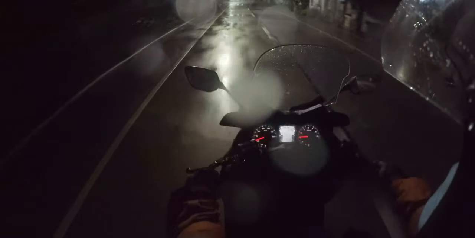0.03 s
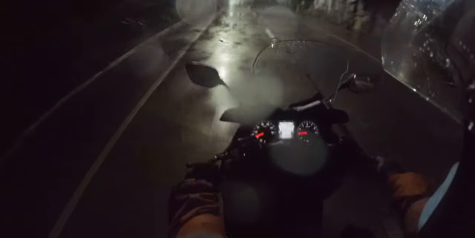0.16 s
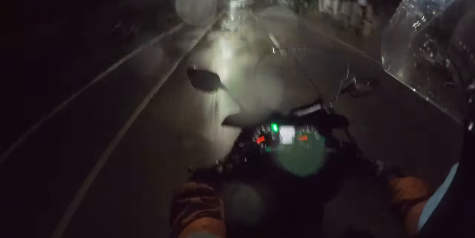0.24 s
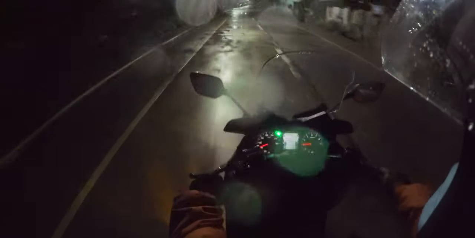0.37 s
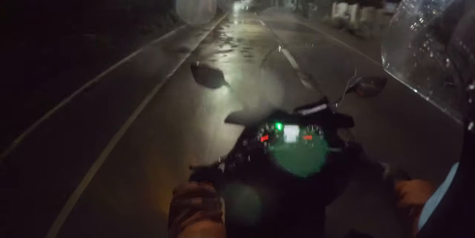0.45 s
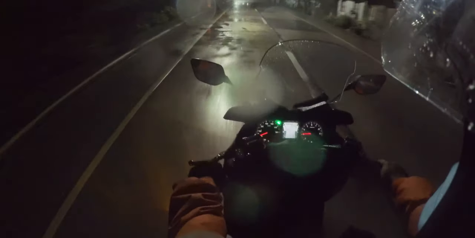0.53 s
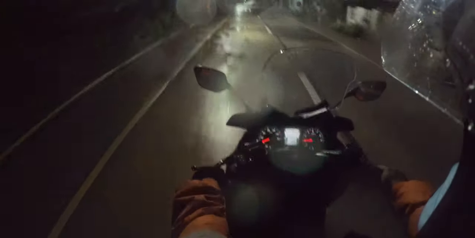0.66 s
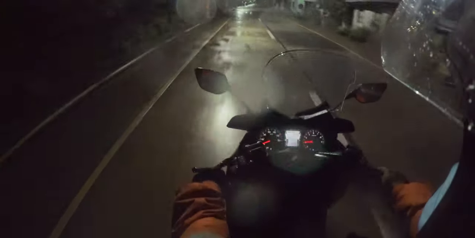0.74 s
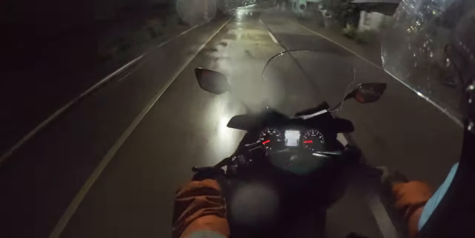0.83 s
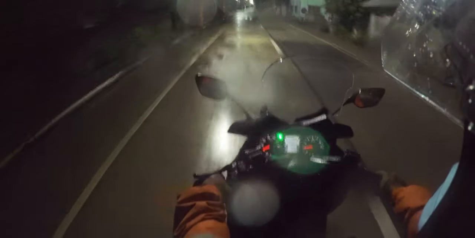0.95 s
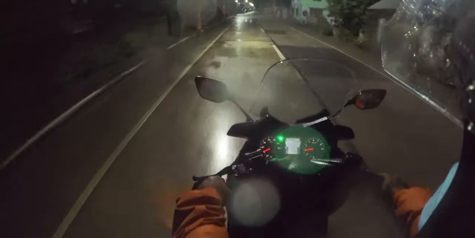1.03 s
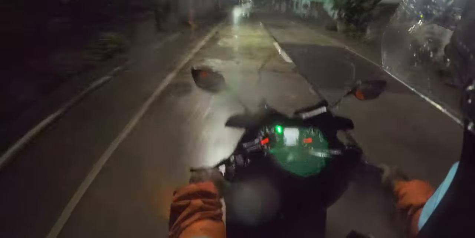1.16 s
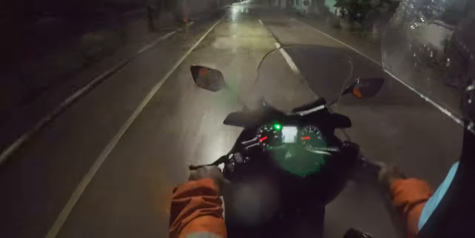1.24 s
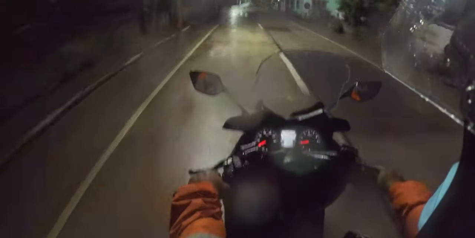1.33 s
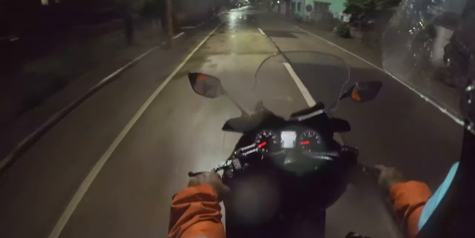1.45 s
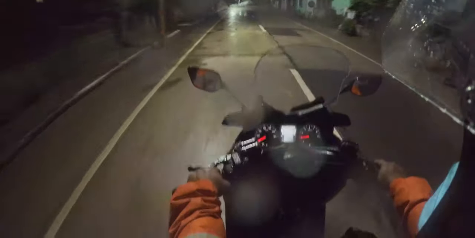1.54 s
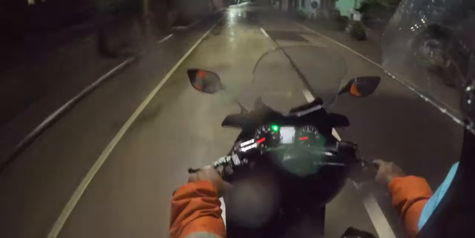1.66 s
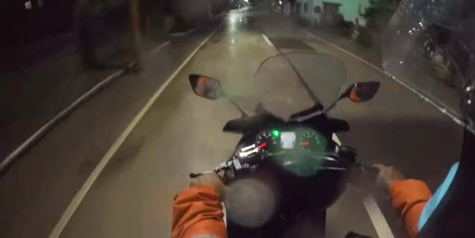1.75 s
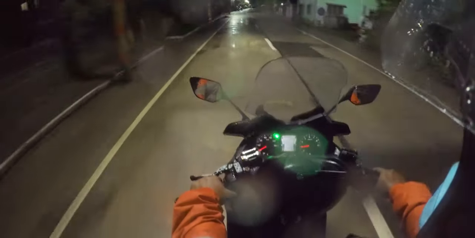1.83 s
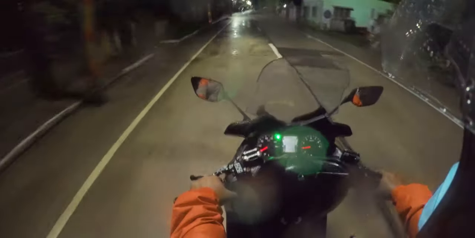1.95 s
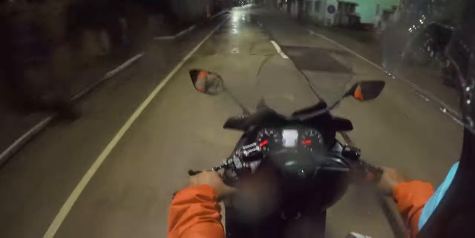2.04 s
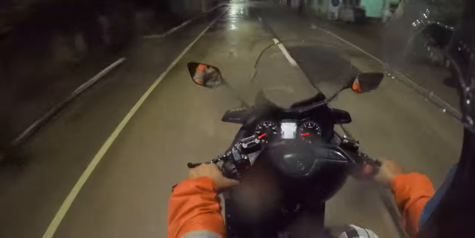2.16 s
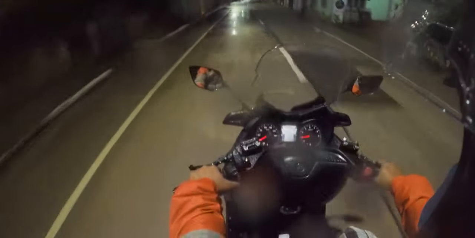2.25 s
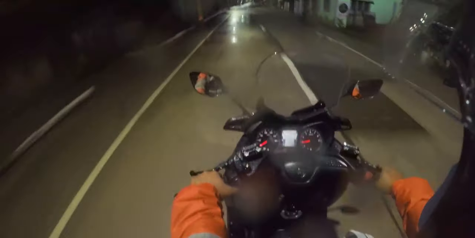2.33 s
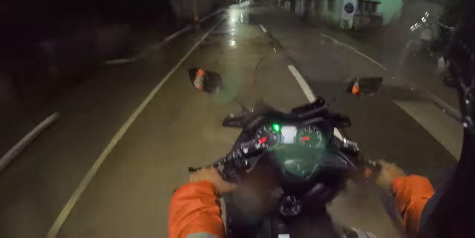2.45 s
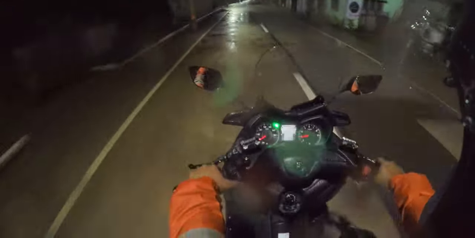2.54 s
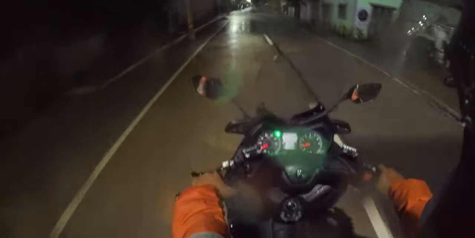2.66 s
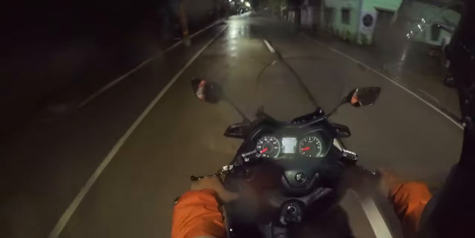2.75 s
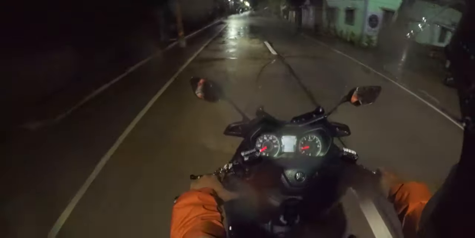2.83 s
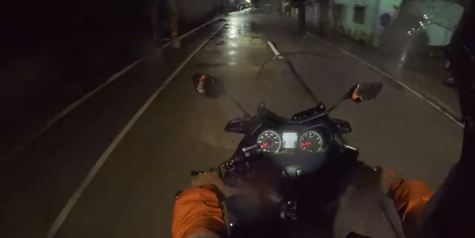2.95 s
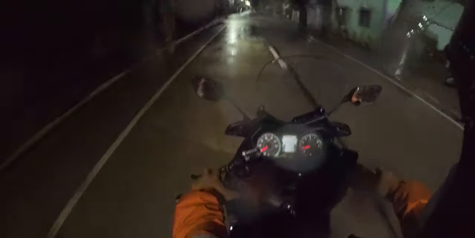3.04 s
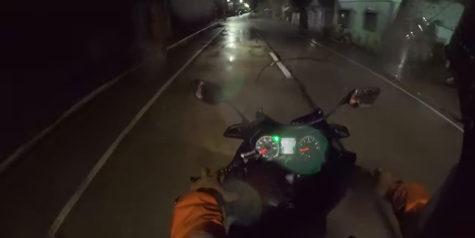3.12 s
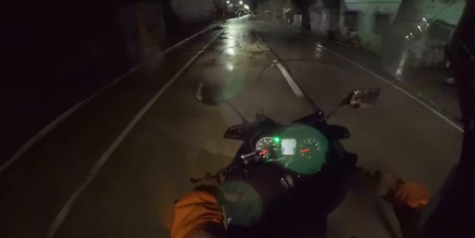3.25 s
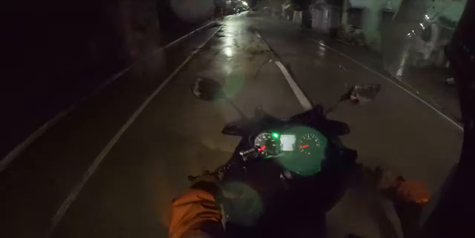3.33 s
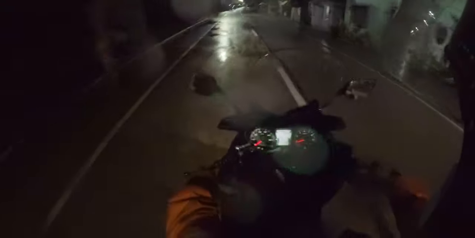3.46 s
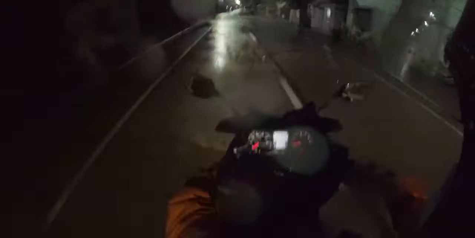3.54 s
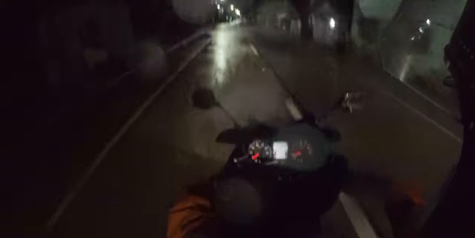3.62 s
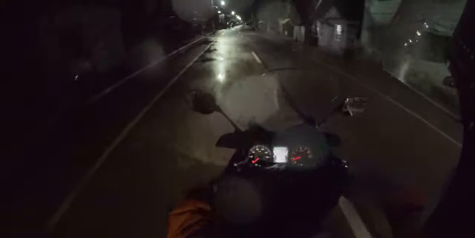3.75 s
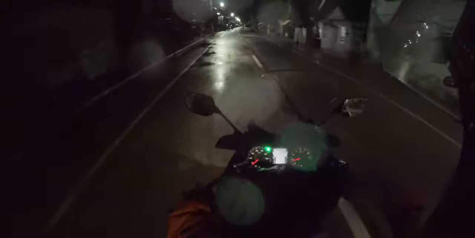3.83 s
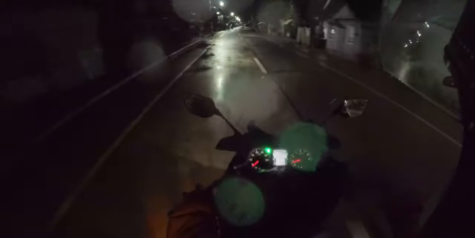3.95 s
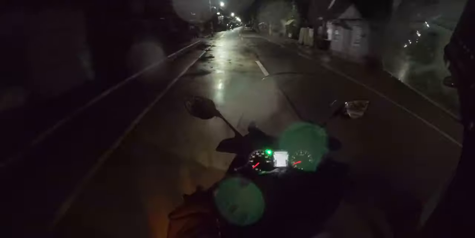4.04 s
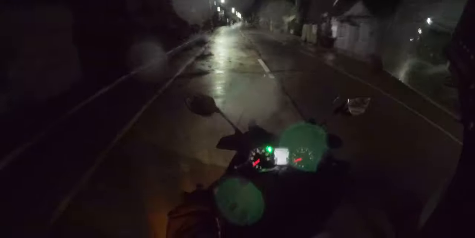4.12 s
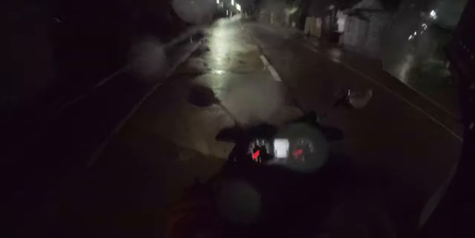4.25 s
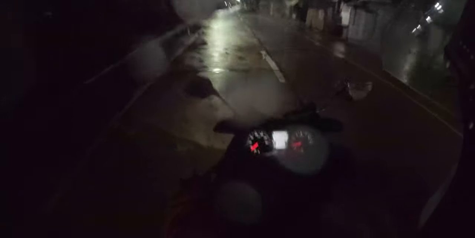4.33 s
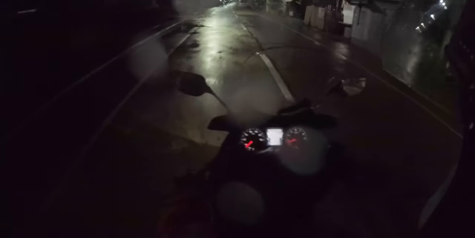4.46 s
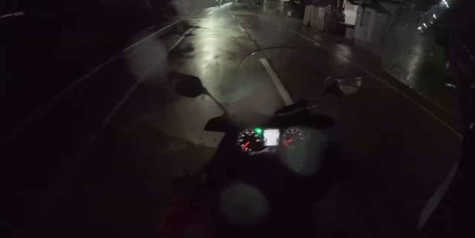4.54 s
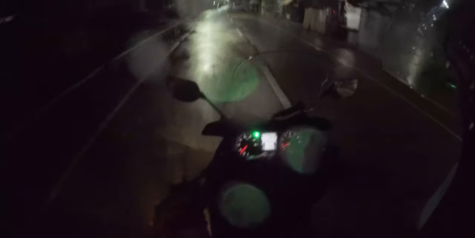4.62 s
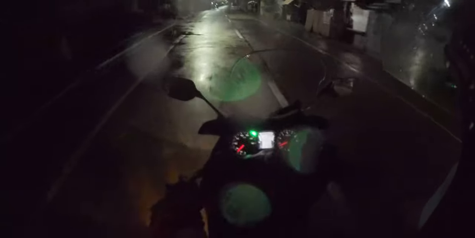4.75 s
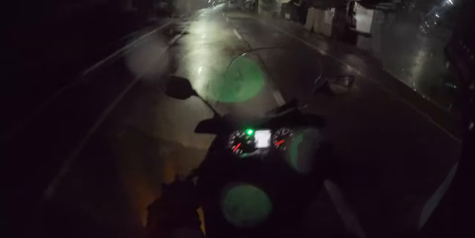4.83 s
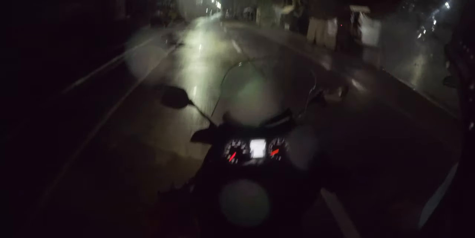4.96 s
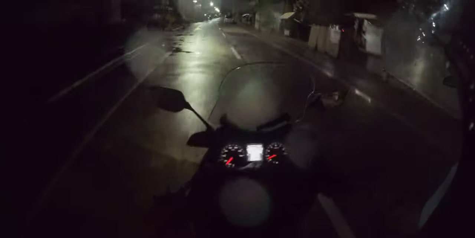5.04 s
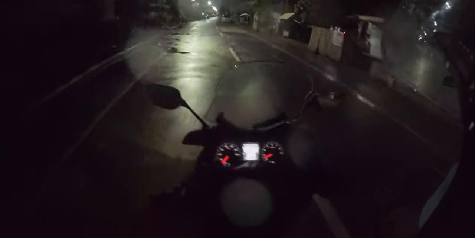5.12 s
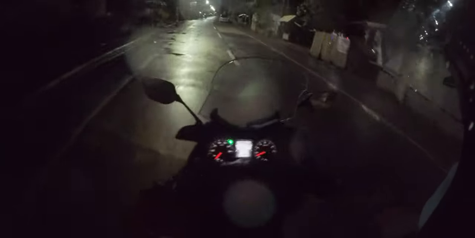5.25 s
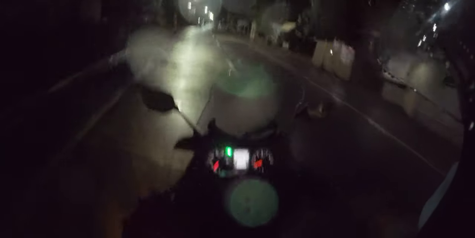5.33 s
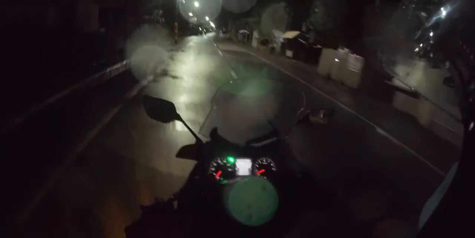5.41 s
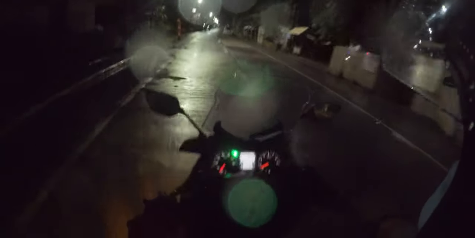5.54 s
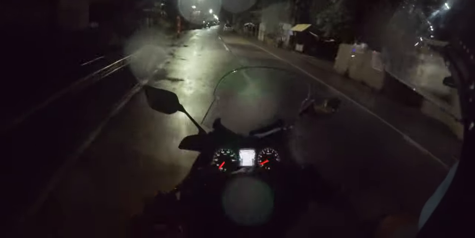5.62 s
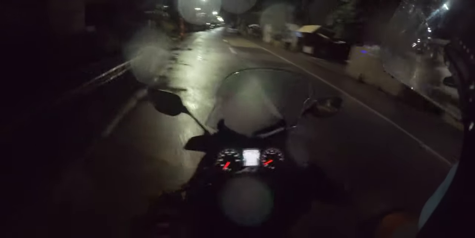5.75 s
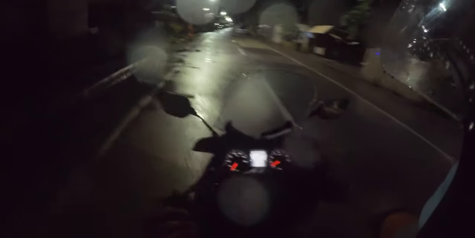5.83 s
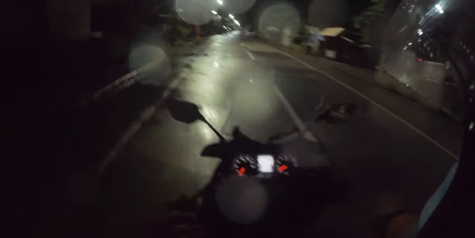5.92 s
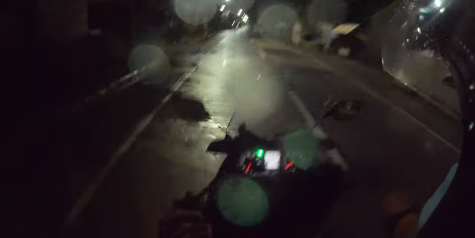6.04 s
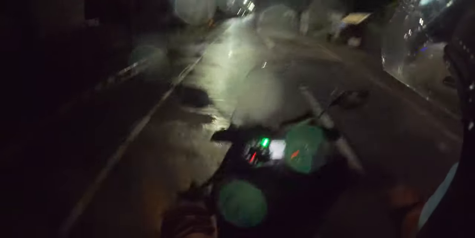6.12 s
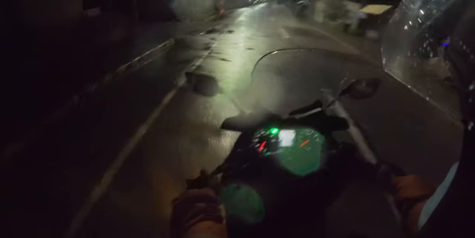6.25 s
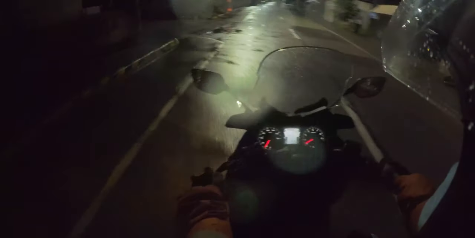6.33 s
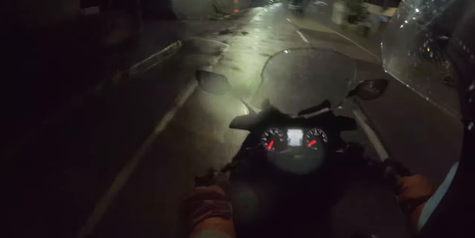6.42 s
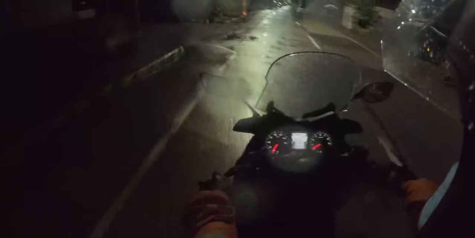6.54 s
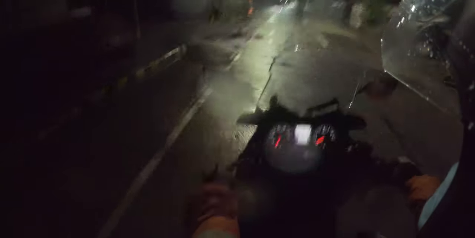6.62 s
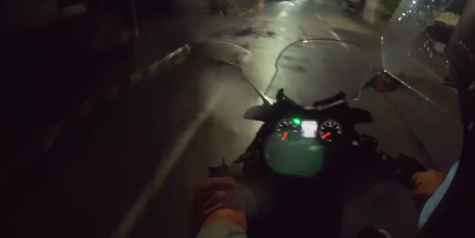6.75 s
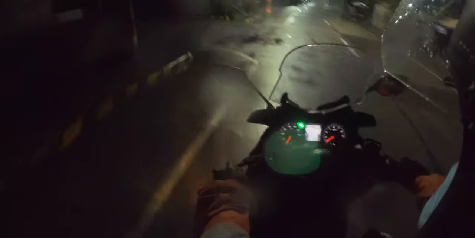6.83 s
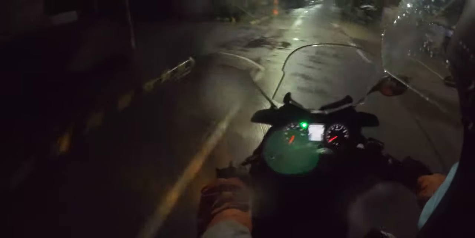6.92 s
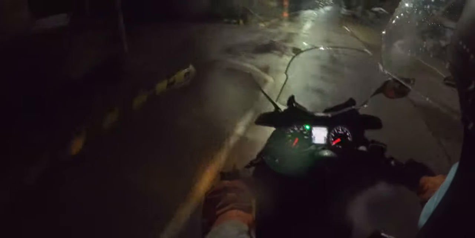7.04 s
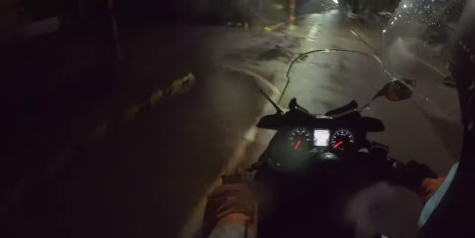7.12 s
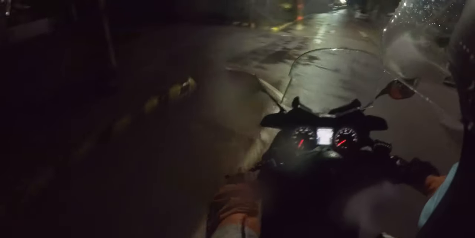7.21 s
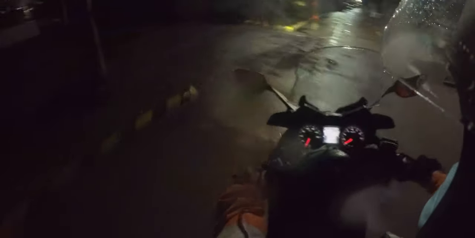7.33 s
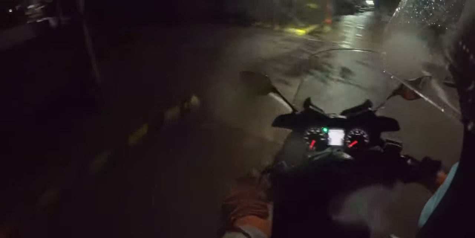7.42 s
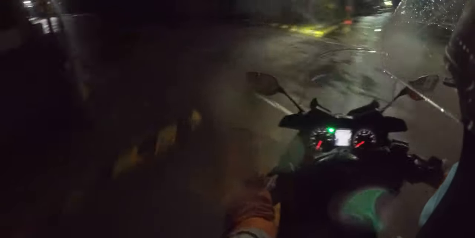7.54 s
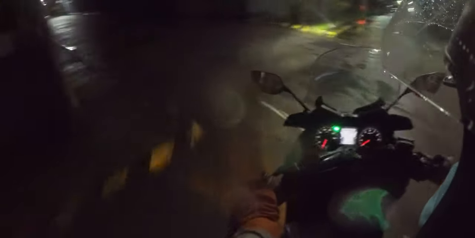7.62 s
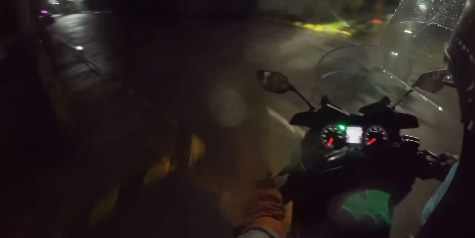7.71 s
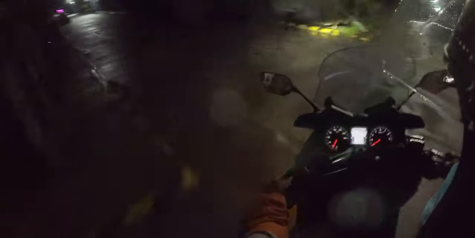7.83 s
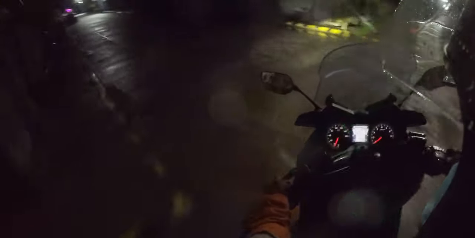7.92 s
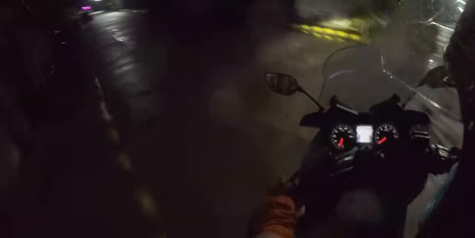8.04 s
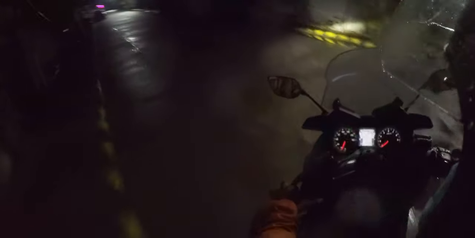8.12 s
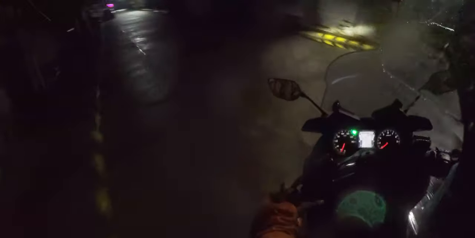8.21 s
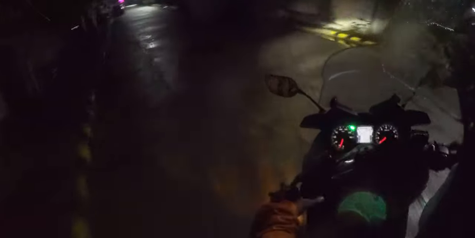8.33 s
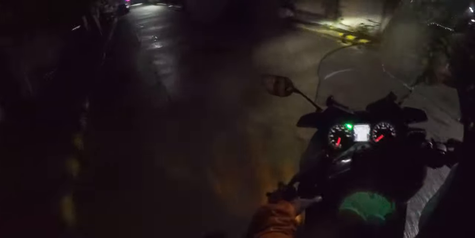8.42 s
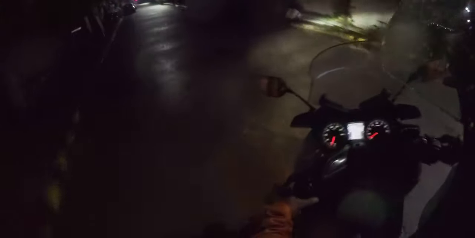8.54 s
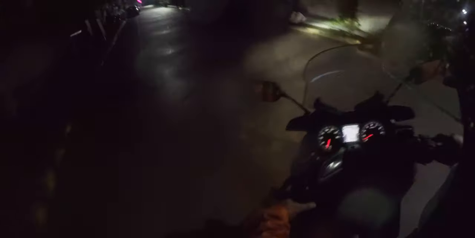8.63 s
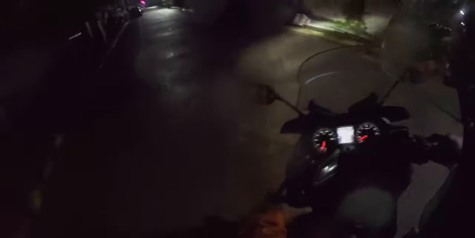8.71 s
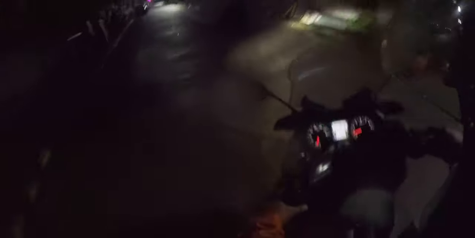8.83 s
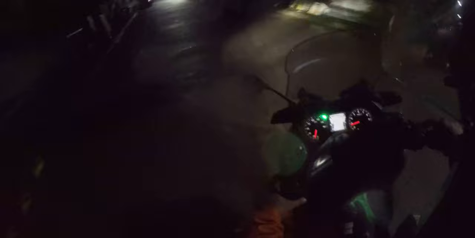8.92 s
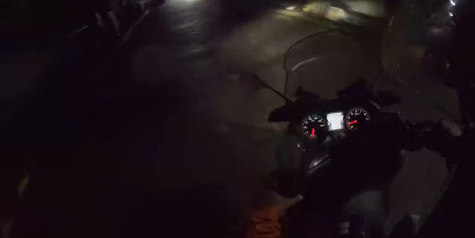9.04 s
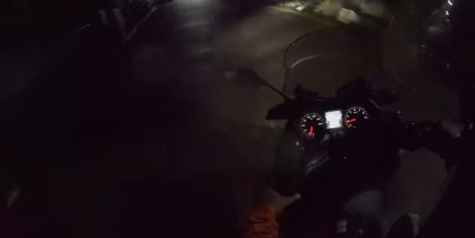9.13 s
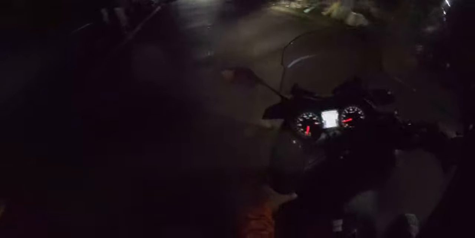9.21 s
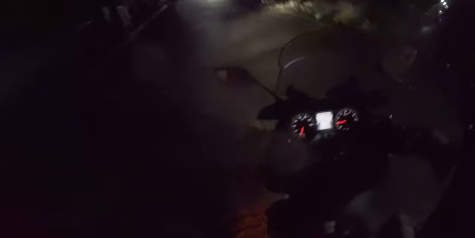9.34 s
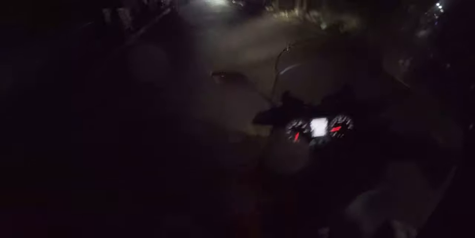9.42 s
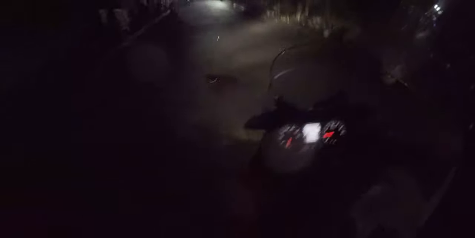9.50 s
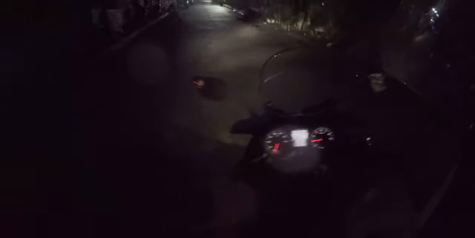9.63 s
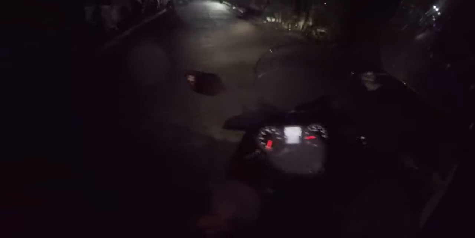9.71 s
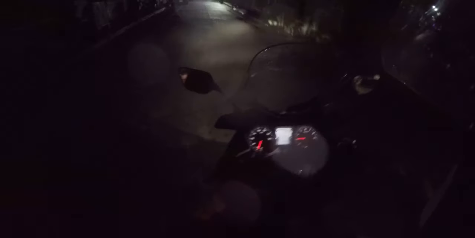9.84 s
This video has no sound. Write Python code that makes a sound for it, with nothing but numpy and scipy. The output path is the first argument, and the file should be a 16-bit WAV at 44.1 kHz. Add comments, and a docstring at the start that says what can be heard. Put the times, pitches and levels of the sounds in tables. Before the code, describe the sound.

A rider's helmet microphone, inside a plastic case, travels along a wet street at night. From 0 to 3.5 seconds, strong low wind flutters and thuds in irregular swells over a dull roar, with patchy wet tyre and rain hiss. Rain gear rustles in dense dry ticks, rapid flaps and short sleeve strokes, especially until 2.8. The bodywork hums low. Drops ring briefly at about 1.0, 1.8 and 2.1; hard cracks strike at 2.4 and most strongly at 3.3. Broad cloth strokes follow around 3.6 to 4.2. From 4.5 the wind, hiss and rustle shrink as the scooter slows. Distinct hollow drops tap at 5.2, 5.8, 6.1, 7.3 and 7.8. Around 8.5 it is nearly stopped and quiet, with barely audible insects. A thin belt whine flickers, peaking near 9.2, while a low pulsing engine gently builds and wind and hiss lift slightly to 9.9.

```python
"""A wet street at night, heard from a cased camera on the helmet of a scooter rider who slows down.
Wind is an uneven slow swing over a lumpy roar of noise; tyres and rain hiss as noise in drifting patches.
The rain gear rustles as many tiny noise slips, the bodywork hums and booms, and insects chirr faintly.
Drops tick and ring on the plastic case as dying sines, and hard ones crack with a burst of noise.
A belt drive whines as narrow noise, and near the end the engine picks up as a stack of harmonics."""
import sys
import numpy as np
from scipy import signal
from scipy.fft import rfft, irfft, next_fast_len
from scipy.io import wavfile
from scipy.ndimage import uniform_filter1d

SR = 44100
rng = np.random.default_rng(int(sys.argv[2]) if len(sys.argv) > 2 else 0)


def persist_wave(psi):
    """Save psi, clipped to +-1, as 16-bit WAV."""
    counts = np.round(np.clip(psi, -1, 1) * 32767).astype(np.int16)
    wavfile.write(sys.argv[1], SR, np.atleast_2d(counts).T)


def magnitude_from_level(level_db):
    """Linear magnitude for a level in decibels (20 dB per decade)."""
    exponent = np.asarray(level_db, float) / 20
    return 10 ** exponent


N = 435266  # length in samples

# riding speed: start_s, share of full speed (0-1)
SPEED = [(0, 0.94), (3.2, 0.93), (4.5, 0.74), (6.2, 0.58), (6.9, 0.32), (8.6, 0), (9.87, 0.36)]
# airflow round the helmet: start_s, buffeting_db (swells are set apart from it), roar_db
AIRFLOW = [(0, -19.5, -17.5), (.7, -11, -27.5), (1.6, -18, -22), (2.0, -14.5, -28.5), (2.75, -16.5, -23),
           (3.4, -20.5, -26.5), (4.0, -23, -28.5), (4.7, -23, -34.5), (5.0, -26.5, -30.5),
           (5.55, -26.5, -35), (6.2, -32.5, -34), (7.1, -33.5, -39), (8.2, -37, -39), (8.8, -32, -39),
           (9.3, -31.5, -38), (9.65, -29.5, -33.5), (9.87, -28, -38.5)]


def evened(x):
    """Scales a sound to rms 1."""
    return x / np.sqrt(np.mean(x ** 2) + 1e-20)


def columns(rows, t):
    """Reads every column of a time curve at the times t."""
    s, *values = np.transpose(rows)
    return [np.interp(t, s, v) for v in values]


def colour_db(points, peaks, hz):
    """A spectrum in dB, read on a log pitch axis, with resonance humps on top."""
    f, db = np.transpose(points)
    humps = sum(p / (1 + (2 * (hz - c) / w) ** 2) for c, w, p in peaks)
    return np.interp(np.log(hz + 1), np.log(f + 1), db) + humps


def add(mix, s, sound):
    """Mixes a sound in at s seconds."""
    part = mix[round(s * SR):][:len(sound)]
    part += sound[:len(part)]


def resonate(x, hz, width):
    """One resonance with a gain of about 1 at its pitch."""
    pole = np.exp((2j * np.pi * hz - np.pi * width) / SR)
    return 2 * signal.lfilter([1 - abs(pole)], [1, -pole], x).real


def narrow_noise(source, hz, width):
    """Noise of rms 1 passed twice through the same resonance."""
    return evened(resonate(resonate(source, hz, width), hz, width))


def drift(per_s):
    """Slow random wander of rms 1; a higher per_s wanders faster."""
    size = int(SR / per_s)
    return evened(uniform_filter1d(uniform_filter1d(rng.standard_normal(N), size), size))


def coloured(db_of_hz):
    """Steady noise of rms 1 with the given spectrum."""
    size = next_fast_len(N)
    spectrum = rfft(rng.standard_normal(size))
    return evened(irfft(spectrum * magnitude_from_level(db_of_hz(np.fft.rfftfreq(size, 1 / SR))), size)[:N])


def ring(modes, t, turns, scale=1):
    """Sum of dying sines: each mode falls 60 dB in its own t60."""
    return sum(magnitude_from_level(db - 60 * t / t60) * np.sin(2 * np.pi * (hz * scale * t + p))
               for (hz, db, t60), p in zip(modes, turns))


def flap(length):
    """Loudness shape of one flap of cloth: a quick start and a slacker end."""
    u = np.arange(0, 1.8 * max(length, .004), 1 / SR)
    return np.minimum(u / 0.0039, 1) * np.exp(-(u / length) ** 1.86)


def wind_swing():
    """Shed eddies push the air to and fro: a slow uneven sine that swells unevenly."""
    # swells of the low wind noise: centre_s, level_db (before low-pass and flicker), fall_s (to 19.3 dB down)
    swells = [(0.105, -20, 0.15), (0.31, -15, 0.26), (0.444, -12.5, 0.044), (0.676, -17.5, 0.27),
              (0.855, -18.5, 0.098), (0.984, -16.5, 0.079), (1.083, -13.5, 0.036), (1.168, -14.5, 0.086),
              (1.265, -20, 0.07), (1.4, -18.5, 0.27), (1.594, -9.5, 0.038), (1.823, -10.5, 0.06),
              (1.928, -13, 0.12), (2.07, -32, 0.078), (2.462, -12.5, 0.049), (2.795, -13, 0.053),
              (2.997, -10, 0.052), (3.113, -16, 0.031), (3.343, -14.5, 0.042), (3.447, -13.5, 0.054),
              (3.551, -10.5, 0.031), (3.804, -12.5, 0.056), (3.929, -15, 0.075), (4.212, -17, 0.039),
              (4.384, -23, 0.053), (4.504, -23, 0.059), (4.67, -21.5, 0.11), (4.901, -24, 0.043),
              (5.017, -21.5, 0.026), (5.21, -18.5, 0.028), (5.376, -18.5, 0.045), (5.602, -24.5, 0.067),
              (5.814, -23.5, .03), (5.977, -27, 0.052), (6.177, -26, 0.13), (6.39, -24.5, 0.029),
              (6.571, -25, 0.037), (6.725, -27, 0.071), (6.99, -32.5, 0.12), (7.154, -26.5, 0.041),
              (7.34, -29.5, 0.03), (7.537, -34, 0.16), (7.71, -35, 0.05), (7.824, -31, 0.064),
              (7.959, -34, 0.1), (8.14, -34, 0.04), (8.257, -33, .05), (8.37, -32, .05),
              (8.561, -32, 0.081), (8.734, -31, 0.042), (8.922, -34.5, 0.11), (9.07, -24, 0.022),
              (9.151, -27, 0.045), (9.378, -26, 0.058), (9.575, -24.5, 0.079), (9.683, -20, 0.03)]
    # swing of the eddies: start_s, rate_hz, unevenness (share of the rate)
    eddies = [(0, 30.59, 0.073), (.95, 30.58, 0.083), (1.2, 33.14, 0.21), (1.9, 31.01, 0.12),
              (3.0, 32.94, 0.18), (3.6, 40.69, 0.19), (4.4, 33.03, .2), (5.3, 41.9, 0.19),
              (6.1, 32.8, 0.196), (7.35, 45.16, .2), (8.4, 37.96, 0.18), (8.7, 31.5, 0.19),
              (9.87, 35.9, 0.15)]
    between_db, lumps_db, lumps_per_s = -7., 4.5, 48  # between swells: against the airflow; random lumps
    swell_rise = 0.97  # rise time as a share of the fall time
    t = np.arange(N) / SR
    flow_db = columns(AIRFLOW, t)[0]
    hz, uneven = columns(eddies, t)
    turns = np.cumsum(hz * (1 + uneven * drift(53.9))) / SR
    power = magnitude_from_level(flow_db + between_db + lumps_db * drift(lumps_per_s)) ** 2
    for s, db, fall_s in swells:
        u = np.arange(-2 * fall_s, 2 * fall_s, 1 / SR)
        u = u[max(0, round((2 * fall_s - s) * SR)):]  # nothing before time 0
        side_s = np.where(u < 0, swell_rise * fall_s, fall_s)
        add(power, s + u[0], magnitude_from_level(db - 19.3 * (u / side_s) ** 2) ** 2)
    swing = np.sqrt(2 * power) * np.sin(2 * np.pi * turns) * magnitude_from_level(1.6 * drift(60.0))
    # a low-pass keeps the swing below about 57 Hz
    return signal.sosfiltfilt(signal.butter(6, 57, fs=SR, output="sos"), swing)


def wind_roar():
    """Rough air makes a lumpy low noise, with resonances of the body in it."""
    # spectrum of the roar before the bass cut below: pitch_hz, level_db (relative, per Hz)
    roar_spectrum = [(7.1, -55), (12, 12), (27, 0.5), (43, 8.5), (51, -1), (107, -28), (140, -26.5),
                     (172, -35), (209, -31), (243, -47), (330, -50.5), (430, -85), (730, -120)]
    # body resonances: pitch_hz, width_hz, boost_db
    frame_humps = [(83.3, 18, 5), (141.6, 48, 4)]
    roar_db = columns(AIRFLOW, np.arange(N) / SR)[1]
    # the last term turns down the part below about 63 Hz
    roar = coloured(lambda f: colour_db(roar_spectrum, frame_humps, f) - 12.53 / (1 + (f / 63.4) ** 8))
    return roar * magnitude_from_level(roar_db + 1.2 * drift(23.0))


def panel_hum():
    """Panels hum as narrow noise that grows steeply with speed."""
    # panels: pitch_hz, width_hz, level_db (at full speed)
    panels = [(207, 7.2, -54), (429.8, 10, -60.5)]
    speed = np.clip(columns(SPEED, np.arange(N) / SR)[0], 0, 1)
    hum = sum(magnitude_from_level(db) * narrow_noise(rng.standard_normal(N), hz, w) for hz, w, db in panels)
    return hum * speed ** 2.8


def wash():
    """Spray and rain hiss as noise in drifting patches; low and high parts follow their own levels."""
    # spectrum of the hiss: pitch_hz, level_db (relative, per Hz)
    wash_spectrum = [(130, -47), (220, 0), (343, -5), (688, -6.5), (1070, -8), (1240, -3), (1400, -6),
                     (1740, -2), (2190, -6.5), (2440, -5), (2910, -9.5), (3610, -9), (5240, -20.5),
                     (13700, -30.5), (15500, -46)]
    # resonances of the camera case: pitch_hz, width_hz, boost_db
    case_humps = [(1186, 240, 3.5), (1890, 470, 1.5), (2120, 220, -7), (2422, 120, 5), (3420, 150, 5),
                  (4650, 590, 7.5), (6620, 2450, 7.5), (10460, 520, 5)]
    # change of the hiss at full speed, more near 750 Hz, less at 1270 Hz and in the top treble:
    # pitch_hz, width_hz, boost_db
    speed_humps = [(747, 550, 7), (1270, 160, -6), (314, 140, 1), (14500, 8300, -4.5)]
    # course of the low part: start_s, level_db (relative; the whole is levelled at the end)
    spray = [(0, -45.5), (.58, -48), (.64, -43), (.77, -53), (.84, -48), (1.4, -44.5), (1.75, -45.5),
             (1.97, -50), (2.23, -47), (2.75, -45.5), (3.16, -50), (3.98, -50), (4.78, -54.5),
             (5.36, -52.5), (5.55, -54.5), (7.1, -55.5), (8.4, -56.5), (9.2, -52), (9.75, -50),
             (9.87, -49.5)]
    treble_db, treble_follows = -36., .68  # treble = treble_db + this share of the airflow dB
    hop, block = 128, 512  # samples
    frames, hz = N // hop + 5, np.fft.rfftfreq(block, 1 / SR)
    a, b, patches = rng.standard_normal((frames, len(hz), 3)).T
    # smooth the patches over 14 frames of time and 6 steps of pitch
    patches = evened(uniform_filter1d(uniform_filter1d(patches, size=14, axis=1), size=6, axis=0))
    flicker = evened(uniform_filter1d(rng.standard_normal(frames), size=4))
    t = np.arange(frames) * hop / SR
    low_db = columns(spray, t)[0]
    high_db = treble_db + treble_follows * columns(AIRFLOW, t)[0]
    # blend from the low level at 1400 Hz to the high one 3.7 times higher
    share = np.clip(np.log(hz / 1400.0 + 1e-3) / np.log(3.7), 0, 1)[:, None]
    field_db = (1 - share) * low_db + share * high_db + 1.94 * patches + 0.9 * flicker
    field_db += colour_db([(1, 0)], speed_humps, hz)[:, None] * columns(SPEED, t)[0]
    field = (a + 1j * b) * magnitude_from_level(field_db + 55)  # 55 only keeps the numbers handy
    fine = evened(signal.istft(field, nperseg=block, noverlap=block - hop)[1][:N])
    shape = magnitude_from_level(colour_db(wash_spectrum, case_humps, np.fft.rfftfreq(N, 1 / SR)))
    return magnitude_from_level(-45.5) * evened(irfft(rfft(fine) * shape, N))


def rain_gear():
    """Wet fabric slips in dense uneven ticks that swell in flaps and strokes, coloured by the cloth."""
    # steady rubbing: start_s, level_db (before a small random wander)
    rubbing = [(.1, -55), (.7, -48.5), (1.65, -45.5), (1.95, -50.5), (3.2, -48.5), (3.45, -50), (4.3, -52),
               (4.34, -60), (5.1, -52), (5.6, -57.5), (8.1, -63.5), (9.5, -60.5), (9.87, -50.5)]
    # flaps: start_s, level_db, length_s
    flaps = [(0.16, -36, 0.036), (0.201, -35, 0.042), (0.314, -30.5, 0.016), (.325, -27.5, 0.028),
             (0.446, -31.5, 0.037), (0.57, -30.5, 0.017), (0.602, -35, 0.042), (0.654, -37.5, .025),
             (0.674, -32.5, 0.015), (0.883, -27.5, 0.0074), (0.936, -33, 0.039), (1.024, -35, 0.018),
             (1.159, -32.5, 0.028), (1.1865, -32, 0.024), (1.305, -32, 0.03), (1.446, -31.5, 0.015),
             (1.523, -34, 0.013), (1.551, -35, 0.016), (1.613, -28.5, 0.0084), (1.659, -33, 0.0072),
             (1.732, -35, 0.041), (1.825, -33, 0.018), (2.126, -39.5, 0.033), (2.21, -35.5, 0.044),
             (2.248, -37, 0.019), (2.294, -30.5, 0.016), (2.323, -36, 0.022), (2.496, -32.5, 0.05),
             (2.534, -29, 0.037), (2.568, -28.5, 0.016), (2.682, -31.5, 0.018), (2.758, -39.5, 0.056),
             (2.789, -32.5, 0.017), (2.819, -36, 0.045), (3.473, -31, 0.016), (3.917, -43, .012),
             (3.976, -37.5, .012), (4.058, -42, .015), (4.1324, -40.5, 0.018), (4.2604, -42, 0.0098),
             (4.327, -39, .012), (4.898, -46, .014), (4.9776, -49, .01), (5.047, -37, 0.0063),
             (5.292, -43, .006)]
    # resonances of the cloth: pitch_hz, width_hz (before widening by half), level_db (relative)
    cloth = [(1700, 970, 2), (2512, 30, 12), (3600, 310, 17), (4730, 220, 3.5), (6060, 88, 3.5)]
    # long strokes of sleeve on jacket: start_s, length_s, level_db (before uneven grip)
    strokes = [(0, 0.065, -40.5), (0.85, .04, -48), (1.06, 0.03, -44), (1.243, 0.065, -47),
               (1.396, 0.064, -45), (1.77, 0.049, -45), (1.89, 0.046, -54), (2.844, 0.17, -52),
               (3.271, 0.085, -44.5), (3.594, 0.19, -42), (3.759, 0.11, -37.5), (3.862, 0.09, -46.5),
               (4, 0.16, -47.5), (4.154, 0.19, -48.5), (4.658, .08, -57), (5.103, .03, -51),
               (7.5, 0.14, -64), (5.244, 0.13, -48), (9.72, .11, -54.5)]
    stroke_edge_s = 0.0076
    snap_s, snap_db = 0.0028, 9  # delay after the start of a flap; size on the scale of the slips
    small_per_s, small_s, small_db = 3.4, 0.011, -2  # rate at full speed; dB against the rubbing
    t = np.arange(N) / SR
    sizes = magnitude_from_level(2.8 * np.minimum(rng.exponential(1, N), 3.))
    slips = sizes * (rng.random(N) < 3500 / SR) * rng.standard_normal(N)  # about 3500 a second
    slips[[round((s + snap_s) * SR) for s, *_ in flaps]] = magnitude_from_level(snap_db)  # each flap starts with a snap
    # neighbouring resonances have opposite signs
    body = sum((-1) ** k * magnitude_from_level(db) * resonate(slips, hz, 1.5 * w) for k, (hz, w, db) in enumerate(cloth))
    body = evened(resonate(resonate(body, 2930.0, 1250.0), 1800.0, 4800.0))
    level = magnitude_from_level(columns(rubbing, t)[0] + 1.5 * drift(60.))
    chance = small_per_s / SR * columns(SPEED, t)[0] ** 2
    small = (rng.random(N) < chance) * rng.exponential(1, N)
    level = level * (1 + magnitude_from_level(small_db) * signal.oaconvolve(small, flap(small_s))[:N])
    grip = magnitude_from_level(3.0 * drift(48.0))
    for s, length, db in strokes:
        u = np.arange(0, length, 1 / SR)
        edges = np.clip(np.minimum(u, length - u) / stroke_edge_s, 0, 1)
        add(level, s, magnitude_from_level(db) * edges * np.resize(grip[round(s * SR):], len(u)))
    for s, db, length in flaps:
        add(level, s, magnitude_from_level(db) * flap(length))
    return body * level


def belt_drive():
    """The belt drive whines faintly: noise squeezed into a narrow band at one pitch."""
    # whine: start_s, level_db
    whine = [(0, -82), (6, -64.5), (8.3, -76), (8.46, -63), (8.74, -68), (8.79, -57), (9.05, -59),
             (9.15, -69), (9.235, -52), (9.28, -72), (9.5, -63), (9.87, -62)]
    tone = narrow_noise(rng.standard_normal(N), 2405, 40)  # pitch and width in Hz
    return tone * magnitude_from_level(columns(whine, np.arange(N) / SR)[0])


def insects():
    """Two neighbours chirr in short uneven throbs: a broad scrape near 6.6 kHz and a narrow overtone."""
    # insects: start_s, level_db (of each overtone; the scrape is 9 dB stronger)
    chirr = [(0, -91), (4.3, -91), (4.6, -87), (8.4, -90), (8.6, -84), (9.87, -84)]
    t, out = np.arange(N) / SR, np.zeros(N)
    for hz, per_s in ((13150., 24.0), (13420., 22.)):  # overtone pitch, throbs a second
        turns = np.cumsum(per_s * (1 + .45 * drift(8.))) / SR
        throb = np.clip(np.sin(2 * np.pi * turns) - .2, .12, 1)
        noise = rng.standard_normal(N)
        overtone = narrow_noise(noise, hz, 200.)
        scrape = narrow_noise(noise, hz / 2, 900.)
        out += evened(throb) * (overtone + magnitude_from_level(9.0) * scrape)
    return out * magnitude_from_level(columns(chirr, t)[0])


def booms():
    """The bodywork booms: low sine notes swell and fade, wavering a little in pitch and level."""
    # booms: centre_s, length_s, pitch_hz (before wavering), level_db (rms at the height, before wavering)
    notes = [(.24, .12, 207, -44), (.69, .12, 207, -46), (1.25, .25, 207, -50.5), (2.1, .15, 205, -49.5),
             (2.9, .25, 207, -44.5), (5.102, .3, 208, -51.5), (4.3, .3, 138, -49), (6.098, .5, 81.8, -48),
             (7.62, .55, 134.8, -51.5), (8.8, .25, 139.9, -54), (9.55, .4, 131.9, -47)]
    out, waver, waver_db = np.zeros(N), 1 + 0.013 * drift(15.0), 2. * drift(18.)
    for (s, length, hz, db), turn in zip(notes, rng.random(len(notes))):
        first = max(round((s - length / 2) * SR), 0)
        bend = waver[first:first + round(length * SR)]
        swell = np.sqrt(2 * np.hanning(len(bend)))
        add(out, first / SR, magnitude_from_level(db) * swell * np.sin(2 * np.pi * (np.cumsum(hz * bend) / SR + turn)))
    return out * magnitude_from_level(waver_db)


def drips():
    """Each drop starts the same shell modes, pitched by where it lands, under a short bright tick."""
    # drops: time_s, level_db, pitch_hz (main ring), t60_s (time to fall 60 dB), tick_db
    drops = [(1.008, -29, 1774, 0.1, -29), (1.3863, -31.5, 1760, 0.058, -36),
             (1.757, -24.5, 1750, 0.073, -29), (2.0195, -33, 1816, 0.023, -32),
             (2.1042, -32, 1820, 0.044, -33), (3.883, -41.5, 1700, 0.17, -40),
             (5.219, -30.5, 1807, 0.12, -40), (5.7897, -20, 1770, 0.078, -34.5),
             (6.1414, -30, 1818, 0.028, -38.5), (6.3838, -38, 1840, 0.022, -38.5),
             (6.5982, -34, 1824, 0.091, -67), (7.1003, -42, 1770, 0.049, -47),
             (7.1763, -42, 1740, 0.064, -42.5), (7.3147, -32.5, 1860, 0.051, -36.5),
             (7.816, -28, 1710, 0.07, -36.5), (8.045, -36.5, 1765, 0.1, -37.5),
             (8.776, -40, 1708, 0.14, -62), (9.0374, -28.5, 1754, 0.037, -40)]
    # modes of the shell: pitch ratio, level_db (relative), share of the drop's t60
    shell_modes = [(.69, -12.5, 0.56), (.8, -9.5, 0.84), (0.967, 0, 0.68), (1.019, 1.4, 0.93),
                   (1.14, -15.5, 0.99)]
    # modes of the tick: pitch_hz, level_db (relative), t60_s
    tick_modes = [(2510, -3, 0.041), (2834, -2.5, 0.031), (3280, -6, 0.018), (3970, -6, 0.012),
                  (4510, -3.5, .014)]
    out, t = np.zeros(N), np.arange(6000) / SR
    phases = rng.random((len(drops), len(shell_modes) + len(tick_modes)))
    for (s, db, hz, t60, tick_db), turns in zip(drops, phases):
        modes = [(ratio, d, t60 * share) for ratio, d, share in shell_modes]
        shell = magnitude_from_level(db) * ring(modes, t, .2 * turns, scale=hz)
        tick = magnitude_from_level(tick_db) * ring(tick_modes, t, turns[::-1])
        add(out, s - .002, (shell + tick) * (1 - np.exp(-t / 0.00083)))  # softened start, 2 ms early
    return out


def cracks():
    """Hard drops start all modes of the case at once, under a burst of noise; the treble dies first."""
    # hard drops: start_s, low_db, middle_db, top_db (levels of the three groups of modes)
    hard_drops = [(1.1557, -41, -39, -30.5), (1.269, -89, -44, -43), (2.374, -17, -19, -21),
                  (2.4497, -16.5, -38, -29), (2.609, -44, -44, -42), (2.6792, -31, -43, -45),
                  (3.136, -19, -28.5, -31.5), (3.2882, -7.5, -12.5, -29), (3.8177, -53, -45, -41),
                  (4.0019, -73, -42, -35), (4.719, -58, -50, -60), (5.0828, -60, -53, -59),
                  (7.635, -65, -53, -52), (7.896, -55, -58, -49), (8.2112, -70, -60, -52)]
    # low, middle and top modes of the case: pitch_hz (before the shift), level_db (relative), t60_s
    lid_modes = [
        [(805, -17, 0.037), (1720, -2, 0.0098), (2504, -7.5, 0.021), (3040, -2, 0.01), (3950, -6, 0.014)],
        [(4710, 0.5, 0.013), (5500, -1, 0.0097), (6560, -3, 0.0099), (7500, 3.5, 0.0051)],
        [(10350, 2, 0.0037), (11600, 1, 0.0026), (13900, -13, .005)],
    ]
    burst_db, burst_s, burst_hz = -3, 0.00096, 10000.  # against top_db; decay time; lower edge
    out, t = np.zeros(N), np.arange(2000) / SR
    high_pass = signal.butter(2, burst_hz, "high", fs=SR, output="sos")
    for (s, *levels_db), (shift, *turns) in zip(hard_drops, rng.random((len(hard_drops), 6))):
        scale = 1 + 0.18 * (shift - .5)  # a random shift of pitch for each crack
        blow = sum(magnitude_from_level(db) * ring(modes, t, turns, scale) for db, modes in zip(levels_db, lid_modes))
        # a very short burst of high noise at the start of the crack
        burst = signal.sosfilt(high_pass, rng.standard_normal(len(t)))
        blow = blow + magnitude_from_level(levels_db[-1] + burst_db) * burst * np.exp(-t / burst_s)
        add(out, s, blow * (1 - np.exp(-t / 0.000068)))
    return out


def engine():
    """One cylinder firing slowly as it pulls away: a stack of harmonics shaped by the exhaust."""
    # firing: start_s, rate_hz (before a slight wander)
    firing = [(8.4, 21.0), (8.7, 22.8), (8.9, 24.2), (9.0, 24.55), (9.3, 25.0), (9.5, 25.3), (9.7, 26.4),
              (9.87, 27.0)]
    # spectrum of the exhaust: pitch_hz, level_db (relative)
    exhaust = [(60, -16.5), (140, 1.5), (210, 0.5), (300, -1.5), (350, -18), (430, -5), (510, -3),
               (620, -18), (800, -10), (1300, -32)]
    # loudness: start_s, level_db
    throttle = [(8.4, -66), (8.8, -55), (9.15, -52.5), (9.5, -58), (9.87, -50)]
    t = np.arange(firing[0][0], N / SR, 1 / SR)
    hz = columns(firing, t)[0]
    turns = np.cumsum(hz * (1 + .003 * drift(15.)[:len(t)])) / SR
    stack = np.zeros(len(t))
    for k in range(3, 50):
        level_db = colour_db(exhaust, [], k * hz[::64]).repeat(64)[:len(t)]  # read every 64 samples
        # each harmonic starts at a random phase
        stack += magnitude_from_level(level_db) * np.cos(2 * np.pi * (k * turns + rng.random()))
    out = np.zeros(N)
    add(out, t[0], evened(stack) * magnitude_from_level(columns(throttle, t)[0]))
    return out


def scene():
    """Everything reaches one microphone."""
    air = wind_swing() + wind_roar() + wash()
    scooter = panel_hum() + belt_drive() + booms() + engine()
    return (air + scooter + rain_gear() + insects() + drips() + cracks())[None]


def top_cut(x):
    """Nothing passes above the cut-off."""
    return signal.sosfilt(signal.butter(12, 15690, fs=SR, output="sos"), x)


def record(dry):
    """The microphone adds its own steady hiss, a coloured noise."""
    # hiss: pitch_hz, level_db (relative, per Hz)
    self_noise = [(6000, -15), (10000, -5), (12500, -10), (15000, -8), (15700, -30)]
    hiss = magnitude_from_level(-74.5) * coloured(lambda f: colour_db(self_noise, [], f))
    return top_cut(dry + hiss)


dry = scene()
out = record(dry)
persist_wave(out)
```